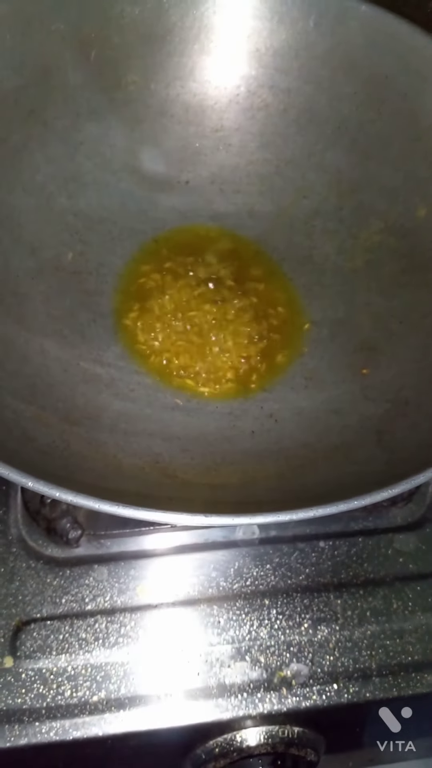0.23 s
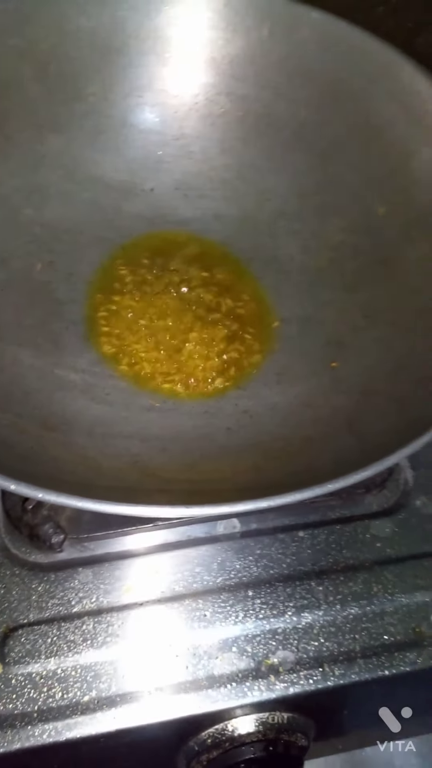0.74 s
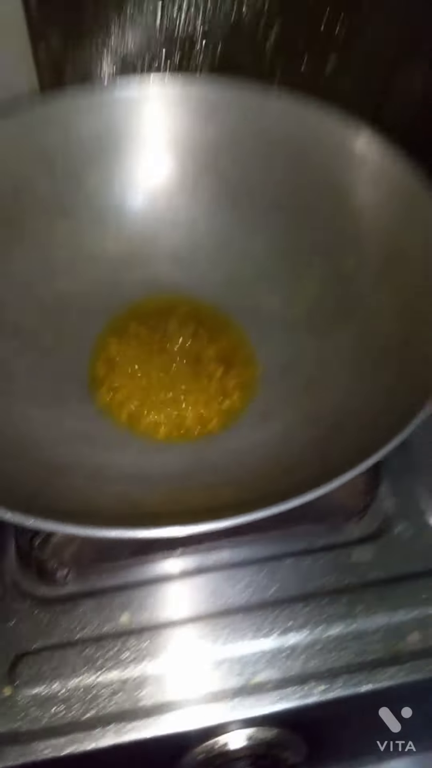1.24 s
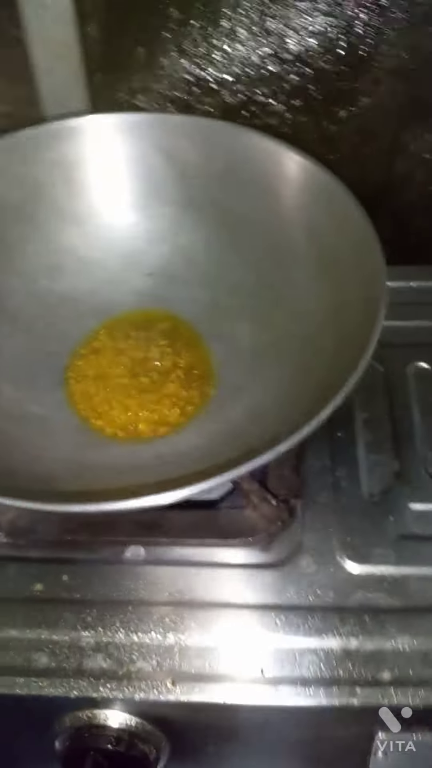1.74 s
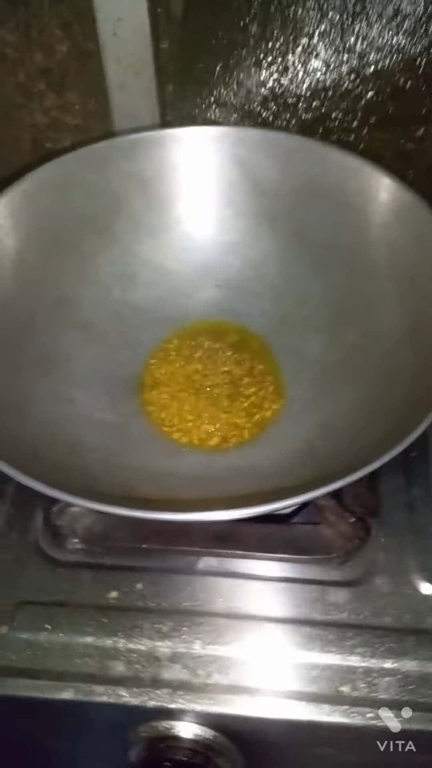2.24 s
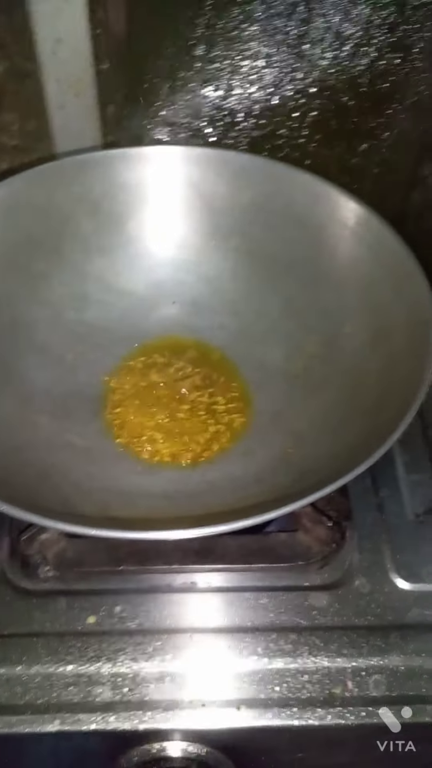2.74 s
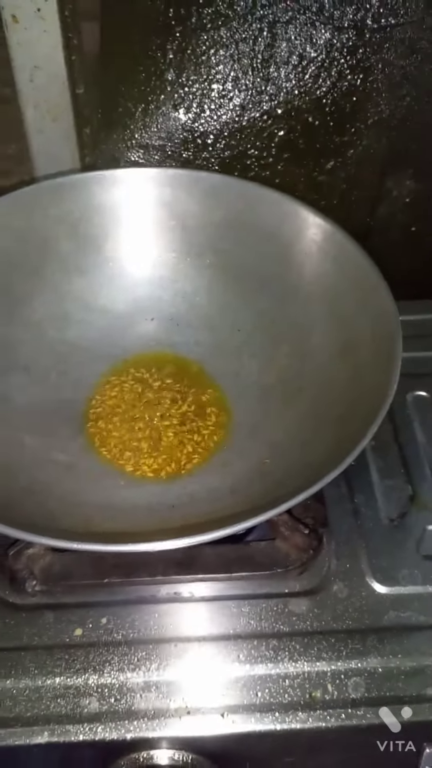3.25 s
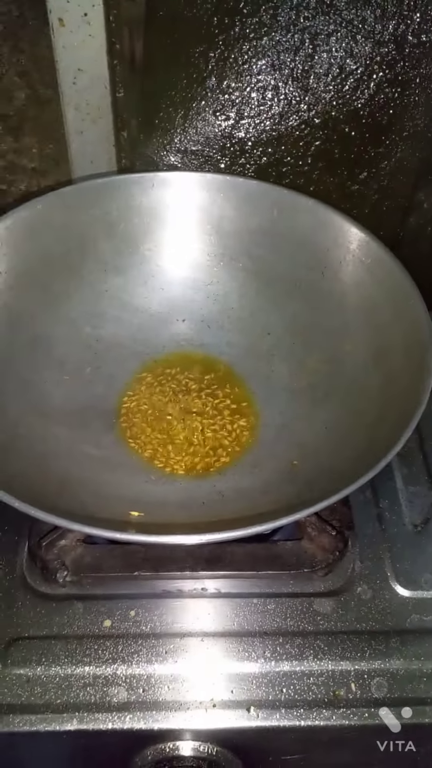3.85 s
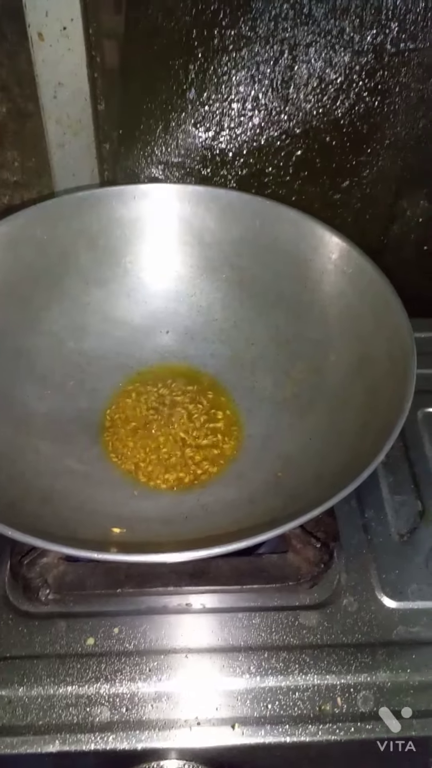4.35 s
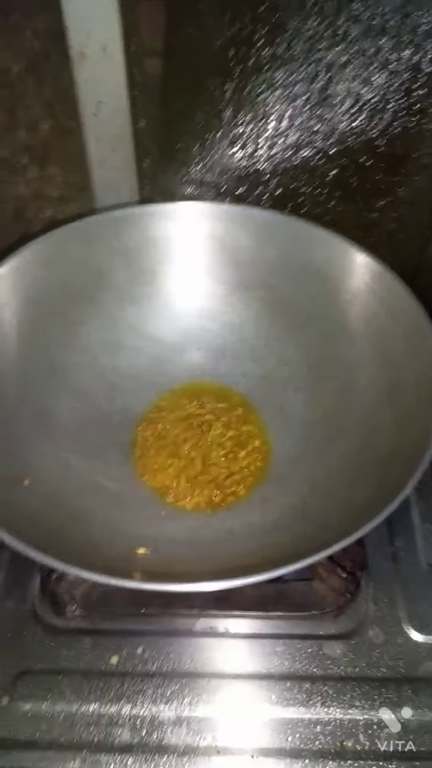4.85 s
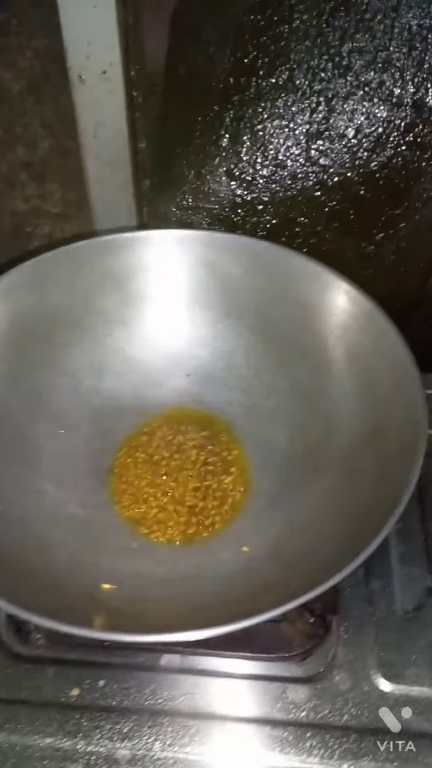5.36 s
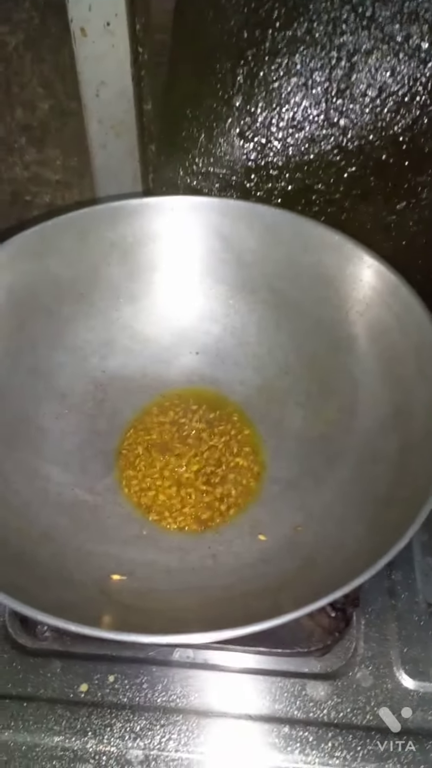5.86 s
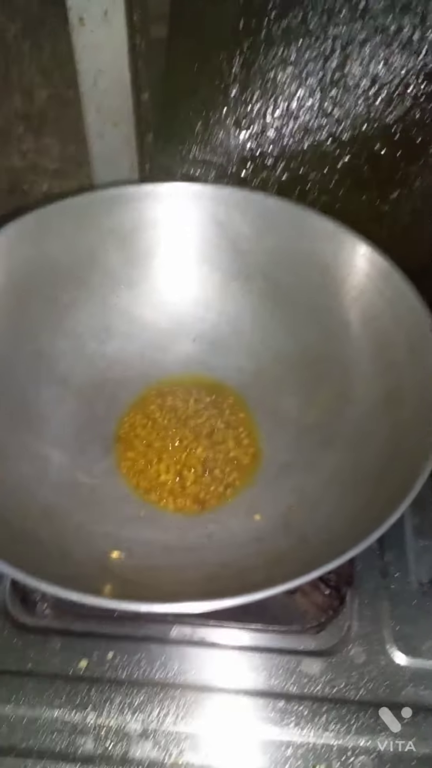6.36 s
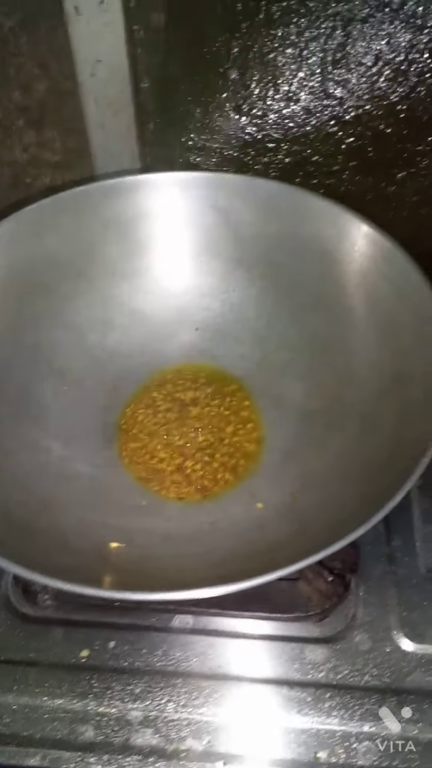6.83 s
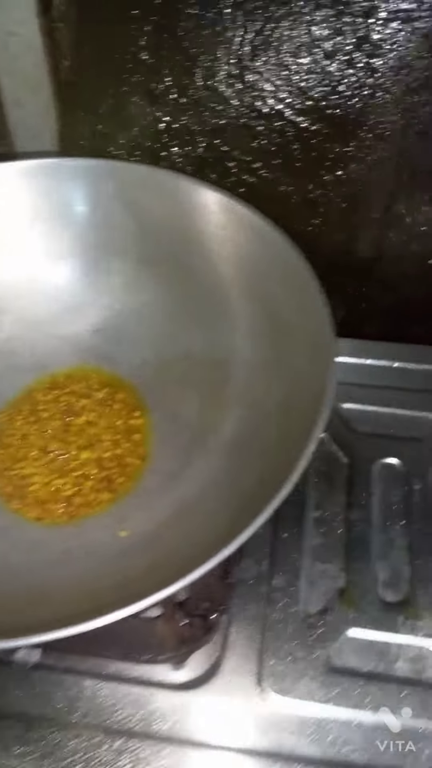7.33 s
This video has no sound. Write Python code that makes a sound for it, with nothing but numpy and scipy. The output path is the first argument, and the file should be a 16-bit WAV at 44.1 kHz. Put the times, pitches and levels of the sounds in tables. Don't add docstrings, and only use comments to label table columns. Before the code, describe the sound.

In a small hard-walled kitchen, a close microphone catches seeds popping in oil. Pops are scattered at first, sparser around two seconds, then busier from about three seconds with crisp loud cracks and hollow steam bursts. Fine hiss of bubbles never stops, slowly losing some body, while the flame rumbles low and faintly wavers in pitch.

```python
import sys
import numpy as np
from scipy import signal
from scipy.fft import rfft, irfft, next_fast_len
from scipy.io import wavfile
from scipy.ndimage import uniform_filter1d

SR = 44100
rng = np.random.default_rng(int(sys.argv[2]) if len(sys.argv) > 2 else 0)


def magnitude_from_level(level_db):
    exponent = np.asarray(level_db, float) / 20
    return 10 ** exponent


def dump(signal):
    limited = np.clip(np.atleast_2d(signal).T, -1, 1)
    pcm = np.round(limited * 32767).astype(np.int16)
    wavfile.write(sys.argv[1], SR, pcm)


N = 335005


def rms_one(x):
    return x / np.sqrt(np.mean(x ** 2) + 1e-20)


def band(x, low_hz, high_hz, order=4):
    return signal.sosfilt(signal.butter(order, [low_hz, high_hz], "band", fs=SR, output="sos"), x)


def passed(low_hz, high_hz, order=4):
    click = 1. * (np.arange(2048) == 0)
    return np.linalg.norm(band(click, low_hz, high_hz, order=order))


def drift(rate):
    r = np.exp(-80 * np.pi * rate / SR)
    chance = rng.standard_normal(N // 40 + 2002)
    slow = signal.lfilter([1], [1, -2 * r, r * r], chance)[2000:]
    return np.interp(np.arange(N) / 40, np.arange(len(slow)), rms_one(slow))


def boost(x, peaks):
    for hz, width, lift_db in peaks:
        r = np.exp(-np.pi * width / SR)
        feedback = [1, -2 * r * np.cos(2 * np.pi * hz / SR), r * r]
        around = signal.lfilter([(1 - r * r) / 2, 0, (r * r - 1) / 2], feedback, x)
        x = x + (magnitude_from_level(lift_db) - 1) * around
    return x


def coloured(white, spectrum, patchy_db):
    hz, level_db = np.transpose(spectrum)
    count = int(3 * np.log2(hz[-1] / hz[0])) + 1
    edges = np.geomspace(hz[0], min(hz[-1], 17000), count)
    together, flicker = drift(2.5), drift(12.4)
    out = 0
    for k, (low, high) in enumerate(zip(edges, edges[1:])):
        centre_db = np.interp(np.log(low * high) / 2, np.log(hz), level_db)
        own = np.roll(flicker, 30011 * k)
        level = magnitude_from_level(centre_db + patchy_db * (.7 * together + own))
        out = out + band(white[k % 2], low, high, order=2) * level
    return rms_one(out)


# start in seconds [s], thud [dB], steam [dB], crack [dB].
SNAPS = [(0.4969, -46, -42.5, -35), (1.299, -63, -51, -45), (1.3355, -51, -37.5, -31.5),
         (1.7455, -66, -42.5, -27.5), (2.0708, -38.5, -33, -23.5), (2.5527, -45, -34.5, -26),
         (2.623, -50.5, -42, -30.5), (3.1698, -65, -55, -34), (3.3649, -67, -51, -42),
         (3.4063, -40.5, -33, -22.5), (3.6382, -42.5, -35, -25.5), (3.9725, -51.5, -49, -37),
         (4.2, -55, -42, -32.5), (4.4594, -50.5, -40.5, -29.5), (4.4878, -49, -41, -33),
         (4.5651, -40, -39.5, -34.5), (4.9029, -42.5, -44, -29.5), (4.9847, -44, -39.5, -30),
         (5.3623, -45, -38.5, -29.5), (5.5005, -53, -34.5, -25.5), (5.5344, -40.5, -33.5, -27),
         (5.8302, -37.5, -38.5, -32.5), (6.0567, -47, -46, -31.5), (6.175, -54.5, -40, -28.5),
         (6.5741, -50.5, -41.5, -29.5), (6.7452, -50, -42.5, -31.5), (7.2151, -56, -50, -35.5),
         (7.3832, -50.5, -38.5, -28), (7.4835, -44.5, -41.5, -28.5)]
# start in seconds [s], thud [dB], steam [dB], crack [dB].
PUFFS = [(0.21, -48, -45, -51), (0.9866, -61, -44, -70), (1.2139, -48, -37.5, -51), (1.2752, -47, -30, -29),
         (1.8272, -44.5, -31, -47), (1.882, -40, -66, -62), (2.9008, -48.5, -41, -53),
         (2.963, -48, -51, -55), (3.1474, -42, -41, -52), (3.1608, -42.5, -25, -62),
         (3.274, -48.5, -37, -51), (3.289, -76, -43, -54), (3.4533, -45, -37, -62),
         (3.7686, -40, -38, -30.5), (3.7762, -42.5, -26, -38), (4.2203, -65, -39.5, -59),
         (4.641, -70, -43, -45), (4.7497, -51, -31, -42), (4.7701, -41, -35.5, -42),
         (4.881, -44, -30.5, -41), (5.1808, -52, -37.5, -52), (5.237, -52, -33.5, -53),
         (5.313, -58, -40, -52), (5.4666, -63, -41, -51), (5.7654, -54, -52, -62), (6.011, -59, -34, -58),
         (6.6155, -71, -38.5, -44), (6.9042, -58, -45.5, -50), (7.2319, -63, -42, -52),
         (7.4276, -61, -37, -49)]
# start [s], thud [dB], steam [dB], crack [dB].
SPLITS = [(0.0005, -47.5, -41, -41.5), (0.0896, -60, -46, -46.5), (0.527, -47, -37, -44),
          (0.5493, -42.5, -42, -37), (0.644, -43.5, -44, -43), (0.6835, -41, -33.5, -29),
          (1.094, -47.5, -44, -39), (1.132, -44, -26, -30), (1.2917, -71, -43, -29.5),
          (1.3633, -42, -30.5, -45), (1.768, -49, -45, -43), (2.8289, -46.5, -39, -43.5),
          (3.345, -47, -31, -27), (3.3883, -48, -51, -46), (3.519, -42.5, -35.5, -41),
          (3.7138, -40.5, -29, -30.5), (4.0686, -44.5, -41, -43.5), (4.3356, -47.5, -31, -34),
          (4.8114, -42, -39, -39), (4.8203, -76, -44, -43), (5.26, -52, -34.5, -34.5),
          (5.321, -42.5, -35.5, -28.5), (5.7029, -48, -41, -37.5), (5.7767, -48, -53, -40.5),
          (5.8543, -40, -34.5, -28), (6.3708, -57, -42.5, -39), (6.522, -49, -39, -33),
          (7.1125, -58, -40.5, -29.5), (7.4387, -42.5, -42, -35.5)]
# start in seconds [s], thud [dB], steam [dB], crack [dB].
SPITS = [(0.1353, -48, -48, -56), (0.1943, -76.5, -45, -42), (0.2988, -63, -49, -56),
         (0.343, -54, -44.5, -49), (0.6225, -61, -46, -50), (0.8132, -76, -47, -58), (1.088, -57, -48, -53),
         (1.6472, -60, -56, -52), (1.972, -76, -54, -58), (2.0395, -46.5, -45, -47),
         (2.281, -49, -45.5, -42), (2.4479, -49.5, -49, -54), (2.483, -52, -48, -52),
         (2.509, -69, -42, -41), (2.5397, -47, -46, -45), (2.693, -48.5, -49, -44),
         (3.951, -60, -42.5, -40), (4.2518, -48.5, -51, -44), (4.3776, -53, -46, -42),
         (4.4005, -49, -45, -47), (4.612, -52, -39.5, -57), (4.724, -53, -43.5, -46),
         (5.0758, -52.5, -44.5, -60), (5.654, -52, -67, -64), (6.29, -67, -51.5, -41),
         (6.399, -55, -64, -42), (6.851, -53.5, -51.5, -47), (7.1512, -53, -62, -60), (7.18, -55, -43, -52),
         (7.5893, -71, -41, -37), (0.181, -60, -49, -60), (0.3896, -69, -52, -48), (1.042, -56, -50, -51),
         (1.7976, -49, -52, -60), (2.1797, -50.5, -52, -53), (2.8587, -65, -58, -45),
         (2.9294, -59, -60, -50), (3.0754, -58, -60, -49), (3.1338, -54, -54, -50), (3.621, -52, -48, -54),
         (3.8894, -70, -62, -48), (3.9194, -68, -60, -51), (4.1726, -69, -53, -58), (4.3036, -60, -50, -44),
         (5.4755, -70, -60, -46), (6.333, -68, -57, -52), (7.37, -62, -51, -44), (7.5594, -68, -62, -49)]
# low limit [Hz], high limit [Hz], time to die by 60 dB [s], far-wall echo [dB].
POP_BANDS = [
    (514, 1650, 0.27, 7),
    (1832, 3096, 0.26, 6),
    (3486, 6090, 0.28, 6),
    (6690, 10490, 0.26, 9),
    (11560, 16300, 0.26, 9.5),
]
THUD_DB, STEAM_DB, CRACK_DB = (-0.95, -4, -23, -40, -40), (-23.5, -7, -0.4, -7.5, -32), (-40, -47, -23, -6, 0.7)
# pitch [Hz], width [Hz], lift [dB].
MIC_PEAKS = [(2214, 294, 5.5), (4830, 2770, 3.5), (13700, 9500, 5)]


def pops():
    table = SNAPS + PUFFS + SPLITS + SPITS
    is_spit = np.arange(len(table)) >= len(table) - len(SPITS)
    click_db = 15.5 - 7.5 * is_spit[:, None]
    t, echo, far_wall = echoes([row[0] for row in table], click_db)
    spread = magnitude_from_level(np.array([THUD_DB, STEAM_DB, CRACK_DB]))
    levels = np.sqrt(magnitude_from_level(np.array(table)[:, 1:]) ** 2 @ spread ** 2)
    out = np.zeros(N)
    for k, (low_hz, high_hz, t60, wall_db) in enumerate(POP_BANDS):
        shape = magnitude_from_level(-60 * t / t60 + wall_db * far_wall - 1.5)
        train = np.zeros(N + len(t))
        for row, level, reflections in zip(table, levels[:, k], echo):
            at = max(0, round((row[0] - .0003) * SR))
            train[at:at + len(t)] += level * shape * reflections
        out += band(train[:N] + 1e-18, low_hz, high_hz) / passed(low_hz, high_hz)
    return boost(out, MIC_PEAKS) * magnitude_from_level(-3.0)


# time in seconds [s], lift [dB].
CLOSENESS = [
    (0, 2.5),
    (1.1, 1),
    (1.5, -2.5),
    (4.0, -1.22),
    (7.6, 0),
]
# delay in seconds [s], loss [dB].
FLAT_SURFACES = [(0.006, -9), (0.0098, -6), (0.0114, -7), (0.013, -7), (0.0165, -8)]
FAR_WALL_S = (0.0094, 0.012)


def echoes(times, click_db):
    t = np.arange(int(.26 * SR)) / SR
    close_db = np.interp(times, *np.transpose(CLOSENESS))[:, None]
    chance = rng.standard_normal((len(times), 2, len(t)))
    same_room = .36
    echo = np.sqrt(1 - same_room) * chance[:, 0] + np.sqrt(same_room) * chance[0, 1, ::-1]
    grain = uniform_filter1d(chance[:, 1], size=16, axis=1) * 4
    echo = echo * magnitude_from_level(2.2 * grain * np.exp(-t / 0.058))
    wall_start, wall_end = FAR_WALL_S
    far_wall = (t > wall_start) * np.clip((wall_end + 0.0012 - t) / 0.0047, 0, 1)
    pan_db = (7.5 + 1.3 * close_db) * np.exp(-t / 0.0015)
    stove_db = -3.0 * (t < .005)
    echo *= magnitude_from_level(pan_db + stove_db)
    lull = (t > .0061) * (t <= wall_start)
    echo *= magnitude_from_level(2.0 * close_db * far_wall - 2.5 * lull)
    click_level = magnitude_from_level(click_db + 2.0 * close_db + 2 * np.clip(chance[:, 1, :1], -1, 1))
    echo[:, :1] = np.sign(chance[:, 0, :1]) * click_level
    for k, (delay_s, loss_db) in enumerate(FLAT_SURFACES):
        vary_db = 3 * np.clip(chance[:, 1, 1 + k], -1.5, 1.5)
        echo[:, round(delay_s * SR)] = echo[:, 0] * magnitude_from_level(loss_db + vary_db)
    return t, echo, far_wall


# start in seconds [s], pitch [Hz], width of the ring [Hz], echo level [dB].
POCKETS = [(0.0995, 6070, 2730, -45), (0.4477, 2570, 1500, -52), (0.9834, 4400, 4490, -55),
           (1.2146, 4830, 2040, -37.5), (1.5915, 2300, 1200, -52), (1.8288, 4480, 2450, -32.5),
           (2.108, 2410, 814, -35.5), (2.932, 2520, 890, -43), (2.9616, 2520, 840, -42),
           (4.2225, 4470, 2010, -37), (4.64, 5340, 1410, -37), (4.8188, 3200, 1800, -30),
           (5.181, 3670, 1470, -34), (5.489, 4430, 2150, -32.5), (6.012, 4340, 1330, -32),
           (6.6145, 4840, 1940, -31), (6.905, 5600, 2320, -33), (7.2331, 4670, 1070, -33.5),
           (0.9994, 2140, 500, -48), (1.074, 5150, 2000, -48), (1.6476, 9500, 3500, -43),
           (1.8822, 1070, 900, -43.5), (1.972, 5770, 2600, -44.5), (5.321, 3830, 1490, -33),
           (5.877, 5560, 2200, -37), (0.8124, 7900, 4000, -45.5), (5.7654, 900, 600, -47.5),
           (1.132, 3220, 1400, -37)]


def pockets():
    t, echo, far_wall = echoes([row[0] for row in POCKETS], click_db=19.5)
    shape = magnitude_from_level(-60 * t / .28 + 12.0 * far_wall)
    out = np.zeros(N + len(t))
    for (s, hz, width, level_db), reflections in zip(POCKETS, echo):
        edges = hz - width / 2, hz + width / 2
        rung = band(reflections * shape, *edges, order=3) / passed(*edges, order=3)
        out[round(s * SR):][:len(t)] += magnitude_from_level(level_db - 2.0) * rung
    return out[:N]


# start in seconds [s], peak
# level [dB], ring pitch [Hz].
DROPS = [
    (1.7669, -7.5, 8620),
    (1.7671, -13, 4300),
    (1.7715, -22, 4300),
    (1.798, -22, 5000),
    (3.17, -8, 4800),
    (1.2845, -17, 7250),
    (1.3355, -11, 14000),
    (1.7457, -12, 14000),
    (4.4705, -12, 14000),
    (5.5346, -8, 14000),
]


def drops():
    t, out = np.arange(441) / SR, np.zeros(N)
    for s, peak_db, hz in DROPS:
        crack = .3 * rng.standard_normal(len(t)) * magnitude_from_level(-60 * t / .005)
        ring = np.sin(2 * np.pi * hz * t) * magnitude_from_level(-60 * t / .0035)
        out[round(s * SR):][:len(t)] += magnitude_from_level(peak_db - 1.5) * (crack + ring)
    return band(out + 1e-18, 2300, 21000, order=2)


# time in seconds [s], level [dB].
LIVELINESS = [(0.0, -58), (0.99, -63.5), (1.29, -65), (1.44, -60), (1.54, -70), (2.01, -64.5), (2.22, -66),
              (3.21, -67.5), (3.32, -60), (3.57, -64), (4.02, -73), (4.76, -62), (5.21, -73), (5.37, -60.5),
              (5.65, -61), (6.7, -67.5), (7.06, -81), (7.6, -61.5)]


def liveliness_db():
    return np.interp(np.arange(N) / SR, *np.transpose(LIVELINESS))


# pitch [Hz], level [dB per Hz].
SIZZLE = [(880, -64), (1500, -7.5), (1890, 0.5), (2110, -6), (3060, -4), (5100, 0.5), (10200, 0),
          (13900, 0.5), (16000, 7), (16500, -31)]


def sizzle():
    born = rng.random(N) < 500 * magnitude_from_level(4.0 * drift(20.0)) / SR
    size_db = 3.5 * np.minimum(rng.exponential(1, N), 4)
    grains = born * rng.standard_normal(N) * magnitude_from_level(size_db)
    white = .35 * rms_one(grains) + .9 * rng.standard_normal((2, N))
    lively_db = liveliness_db()
    level_db = -49.5 + .27 * (lively_db - lively_db.mean())
    hiss = magnitude_from_level(level_db) * coloured(white, SIZZLE, patchy_db=1.0)
    coarse = signal.lfilter(*signal.butter(2, 3500, fs=SR), hiss)
    settling_db = -0.65 * (np.arange(N) - N / 2) / SR
    return hiss + (magnitude_from_level(settling_db) - 1) * coarse


# pitch [Hz], width [Hz], lift [dB].
PAN_BOWL = [(761, 18, 5.5), (800, 43, -7.5), (1147, 146, -5), (2273, 45, -13), (2300, 24, 4),
            (2630, 60, 3.5), (3020, 40, -3), (3312, 22, 3.5)]


def pan_bowl(x):
    return boost(x, PAN_BOWL)


# pitch [Hz], level [dB per Hz].
PAN_HUM = [(240, -40), (400, 11), (669, -9.5), (743, 8.5), (1130, -7.5), (1900, -17), (2470, -32),
           (4180, -120)]


def pan_hum():
    return magnitude_from_level(liveliness_db()) * coloured(rng.standard_normal((2, N)), PAN_HUM, patchy_db=1.5)


# peak in seconds [s], then the lift of the roar [dB],
# of the lowest room mode [dB] and of the second [dB].
FLARES = [(0.17, 3.5, 18, 7), (0.5, 2.5, 4, 5.5), (0.97, -2, 7, 9.5), (1.82, 3.5, 9, 3), (3.2, 1.5, 7, 6),
          (4.1, -3.7, 4, 3), (4.86, 2.5, 5, 11), (5.23, -2, 6, 16), (6.45, 4, 12, 2), (7.2, -0.5, 14, 10),
          (7.58, 4.5, 10, 9)]


def flares():
    rise_s, fall_s = 0.19, 0.23
    t, lifts = np.arange(N) / SR, np.zeros((3, N))
    for s, *lift_db in FLARES:
        shape = np.interp(t, [s - rise_s, s, s + fall_s], [0, 1, 0])
        lifts = np.maximum(lifts, np.outer(lift_db, shape))
    return lifts


# pitch [Hz], level [dB per Hz].
FLAME = [(25, -26), (45, -21), (90, -6.5), (170, -2.5), (300, -2), (400, -11.5), (520, -24)]
# pitch [Hz], width [Hz], lift [dB].
ROOM_MODES = [(82.6, 22, -8), (237.5, 13, 3), (348.7, 6.9, 8.5), (438, 7.4, 6), (723, 10, 3.5)]
# pitch [Hz], width [Hz].
LOW_MODES = [
    (64, 4.7),
    (115, 7),
]


def rumble():
    roar_lift, *mode_lifts = flares()
    roar = magnitude_from_level(-56.5 + roar_lift) * coloured(rng.standard_normal((2, N)), FLAME, patchy_db=2.0)
    out = boost(pan_hum() + band(roar, 21, 410, order=3), ROOM_MODES)
    calm_modes_db = -68, -61
    for (hz, width), calm_db, lift in zip(LOW_MODES, calm_modes_db, mode_lifts):
        mode = rms_one(band(rng.standard_normal(N), hz - width / 2, hz + width / 2, order=1))
        out += magnitude_from_level(calm_db + lift) * mode
    return out


# middle in seconds [s], level [dB].
SINGING = [
    (0.5, -68),
    (2.33, -56),
    (2.6, -59.5),
    (3.3, -56),
    (3.46, -59),
    (3.66, -55.5),
    (4.22, -52.5),
    (4.56, -54.5),
    (5.65, -64),
]


def singing():
    t = np.arange(N) / SR
    swell = sum(magnitude_from_level(db) * np.exp(-.5 * ((t - s) / 0.056) ** 2) for s, db in SINGING)
    pitch_hz = 235.3 + 2.976 * drift(3.84)
    return np.sqrt(2) * swell * np.sin(2 * np.pi * np.cumsum(pitch_hz) / SR)


def scene():
    crackle = pops() + pockets() + drops()
    mono = pan_bowl(crackle + sizzle()) + rumble() + singing()
    return np.array([mono, mono])


# start [s], end [s], share of the patches that turn [0-1].
NOISE_FILL = [(0.055, 0.09, 0.63), (0.334, 0.404, 0.7), (0.766, 0.834, 0.43), (1.271, 1.304, 1),
              (1.343, 1.414, 0.6), (1.496, 1.518, 0.55), (2.036, 2.072, 0.4), (2.213, 2.392, 0.35),
              (2.774, 2.825, 0.5), (2.958, 3.186, 0.37), (3.342, 3.374, 1), (3.898, 3.971, 0.7),
              (4.133, 4.2, 0.3), (4.215, 4.351, 0.66), (4.537, 4.614, 0.66), (4.856, 4.867, 0.5),
              (5.648, 5.68, 0.6), (5.92, 5.999, 0.35), (6.138, 6.168, 1), (6.36, 6.398, 0.09),
              (6.434, 6.519, 0.3), (6.805, 6.826, 0.6), (6.908, 7.092, 0.26), (7.32, 7.395, 0.73),
              (7.526, 7.606, 0.63)]


def noise_fill(x):
    frame, count = 941, 9
    share, size = np.zeros(N), next_fast_len(N)
    for start, end, part in NOISE_FILL:
        share[round((start + .004) * SR):round((end - .004) * SR)] = part
    hz, edges = np.fft.rfftfreq(size, 1 / SR), np.linspace(9000, 15750, count + 1)
    sound, noise = rfft(x[0], size), rfft(rng.standard_normal((2, size)))
    out = x.copy()
    for low, high, draw in zip(edges, edges[1:], rng.random((count, N // frame + 1))):
        draw = np.repeat(draw, frame)[:N]
        part = irfft(sound * ((hz >= low) & (hz < high)), size)[:N]
        level = np.sqrt(uniform_filter1d(part ** 2, size=512, origin=200) + 1e-14)
        swapped = uniform_filter1d(1. * (draw < share), size=256)
        inside = (hz > low + 50) & (hz < high - 50)
        alike, opposite = rms_one(irfft(noise * inside, size)[:, :N])
        alike_db = np.where(share > .9, -16.0, -13.5 + 11.5 * np.sin(40 * draw))
        fill = magnitude_from_level(alike_db) * alike + magnitude_from_level(-2.5) * opposite * [[1], [-1]]
        out += swapped * (level * fill - part)
    return out


# start [s], end [s], low limit [Hz], high limit [Hz].
DROPOUTS = [(2.815, 2.82, 10500, 16000), (3.14, 3.153, 11500, 14000), (5.503, 5.507, 500, 2000),
            (5.523, 5.528, 500, 1600), (6.163, 6.171, 900, 3300), (6.505, 6.511, 900, 3700),
            (6.505, 6.51, 10700, 14800), (6.511, 6.519, 700, 1700), (6.569, 6.573, 700, 3500),
            (6.738, 6.743, 700, 3000), (7.103, 7.109, 700, 2300)]


def dropouts(x):
    pad, out = 512, x.copy()
    for start, end, low_hz, high_hz in DROPOUTS:
        at, stop = round(start * SR) - pad, round(end * SR) + 64
        length = stop - at
        piece = out[:, at:stop] * signal.windows.tukey(length, .2)
        hz = np.fft.rfftfreq(length, 1 / SR)
        part = irfft(rfft(piece) * ((hz > low_hz) & (hz < high_hz)), length)
        gate = np.interp(np.arange(length), [pad - 64, pad, length - 128, length - 64], [0, 1, 1, 0])
        out[:, at:stop] -= .96 * gate * part
    return out


def top_cut(x):
    return signal.sosfilt(signal.butter(12, 16970, fs=SR, output="sos"), x)


def record(dry):
    cut = signal.sosfilt(signal.cheby2(16, 38, 15900, fs=SR, output="sos"), dry)
    mix = dropouts(noise_fill(cut))
    return top_cut(mix)


dry = scene()
out = record(dry)
dump(out)
```